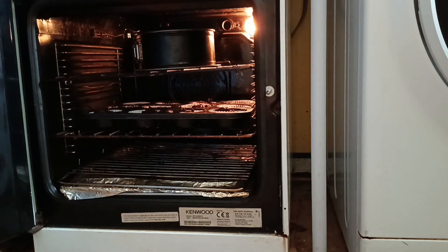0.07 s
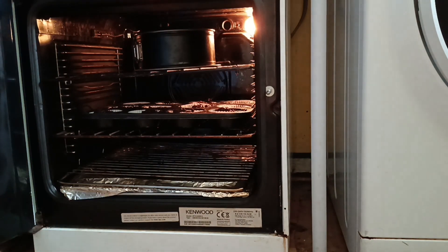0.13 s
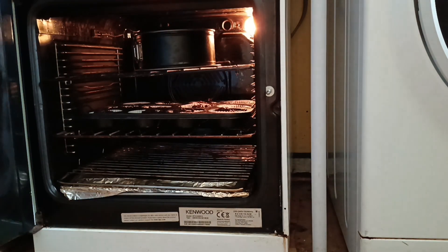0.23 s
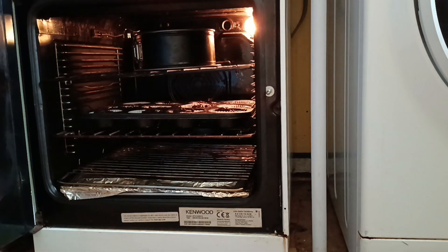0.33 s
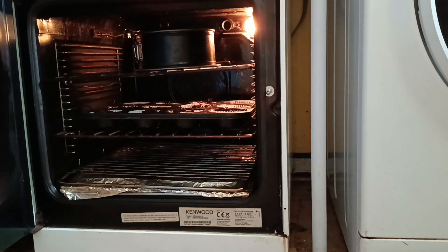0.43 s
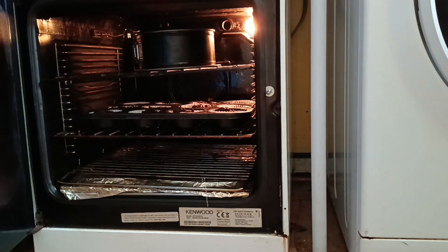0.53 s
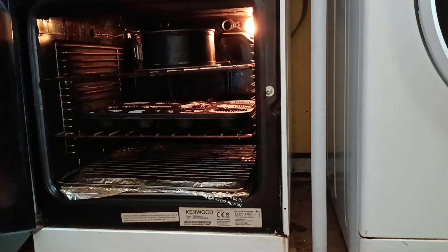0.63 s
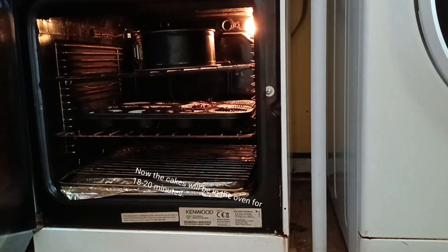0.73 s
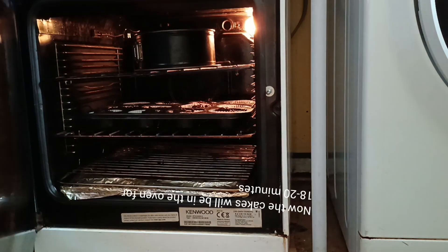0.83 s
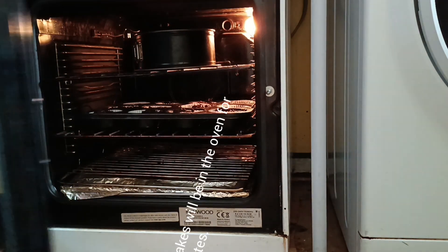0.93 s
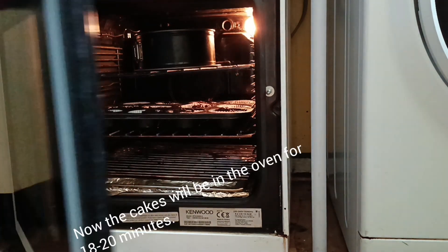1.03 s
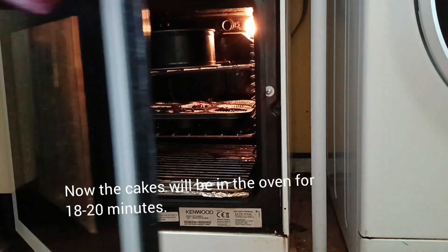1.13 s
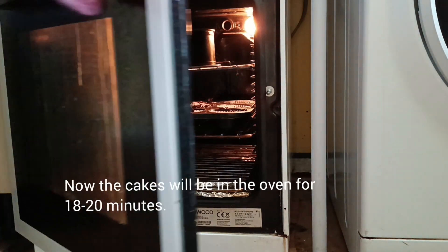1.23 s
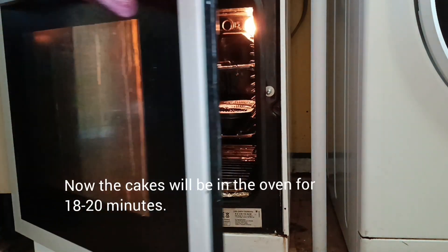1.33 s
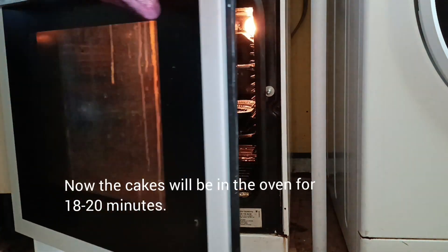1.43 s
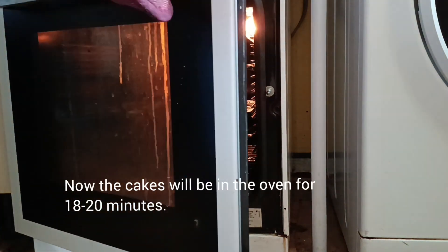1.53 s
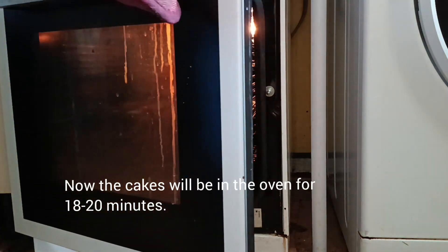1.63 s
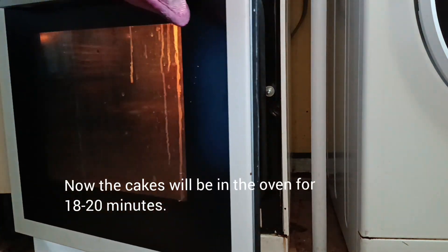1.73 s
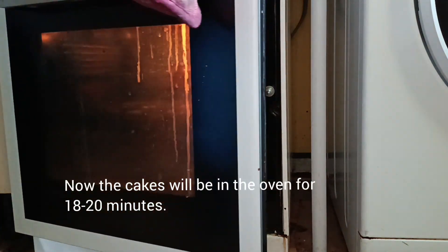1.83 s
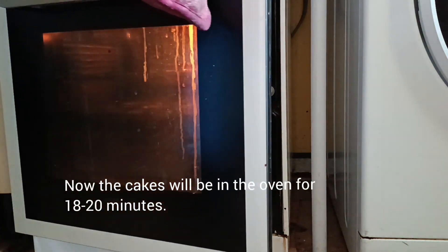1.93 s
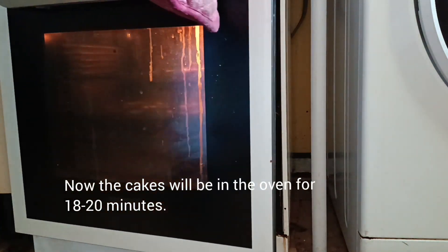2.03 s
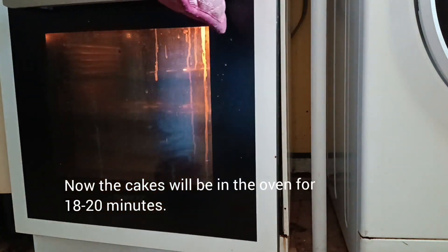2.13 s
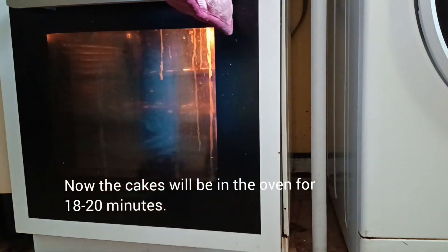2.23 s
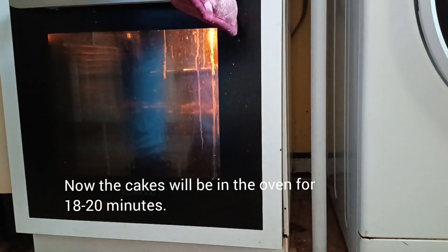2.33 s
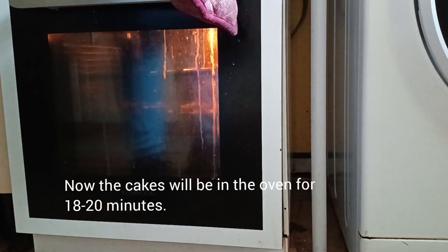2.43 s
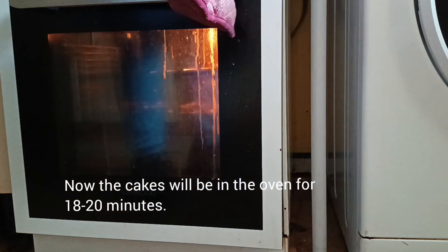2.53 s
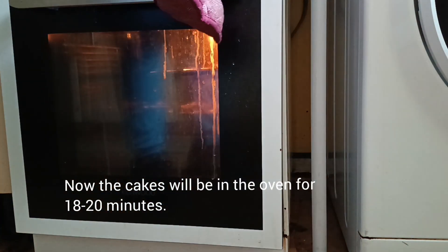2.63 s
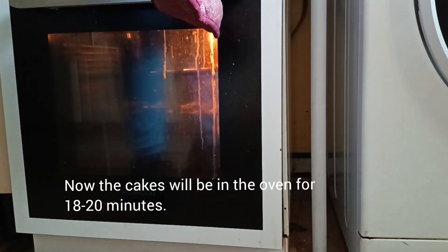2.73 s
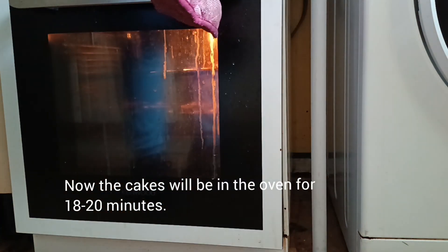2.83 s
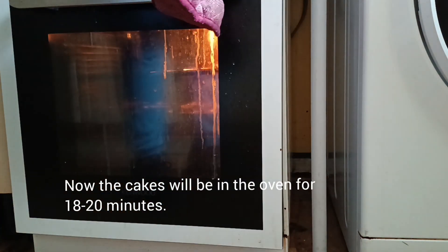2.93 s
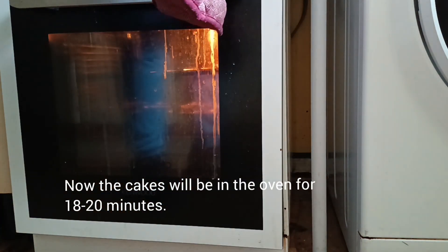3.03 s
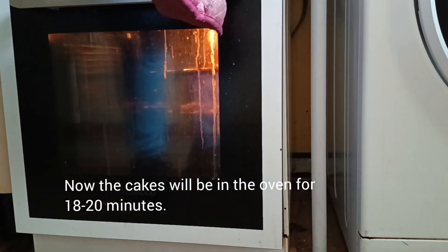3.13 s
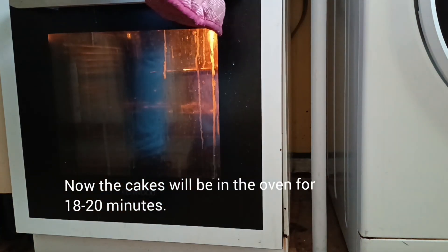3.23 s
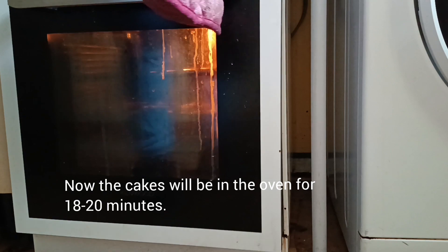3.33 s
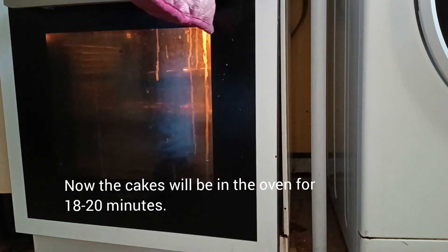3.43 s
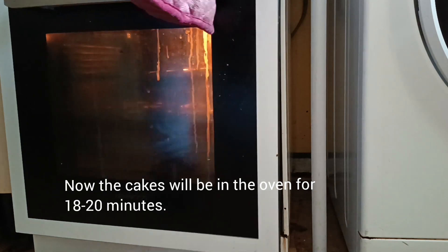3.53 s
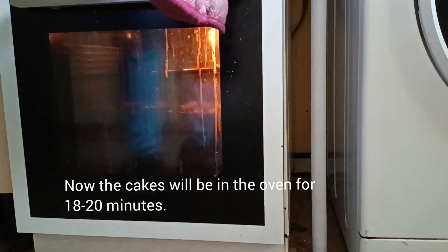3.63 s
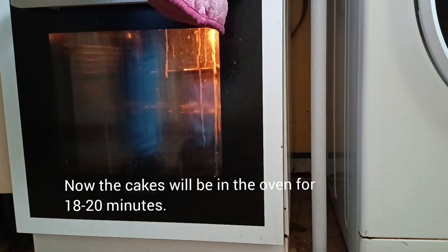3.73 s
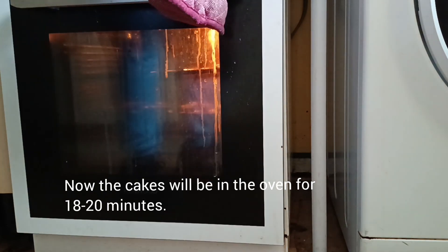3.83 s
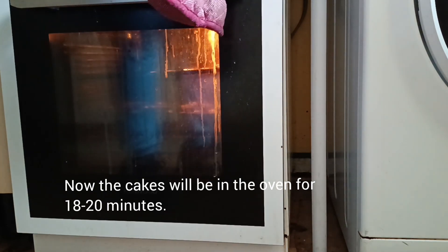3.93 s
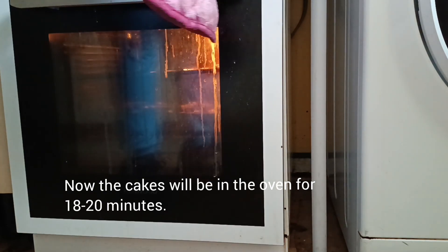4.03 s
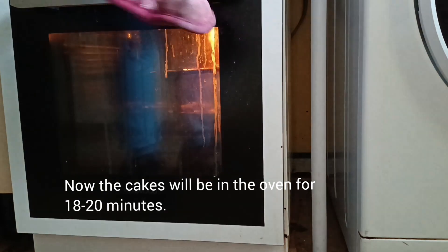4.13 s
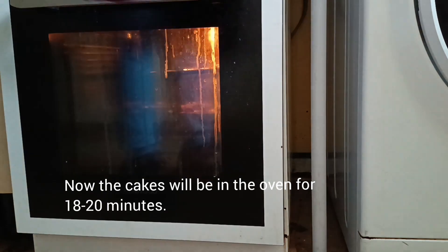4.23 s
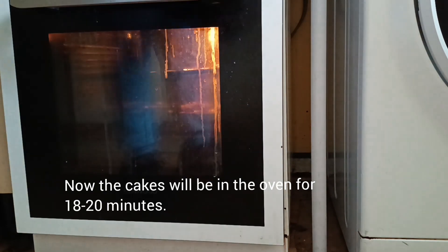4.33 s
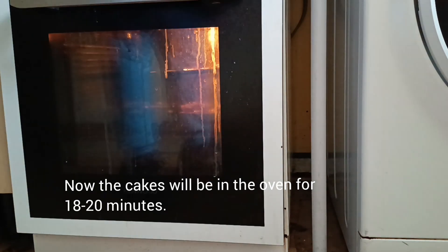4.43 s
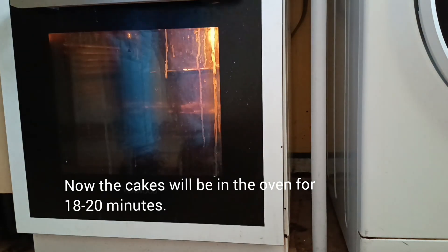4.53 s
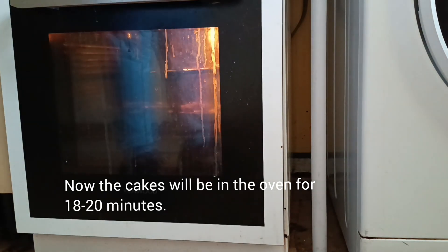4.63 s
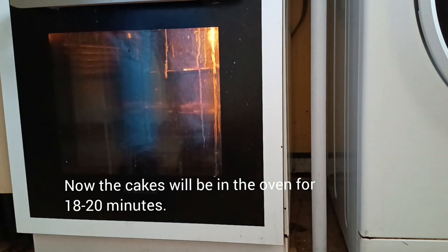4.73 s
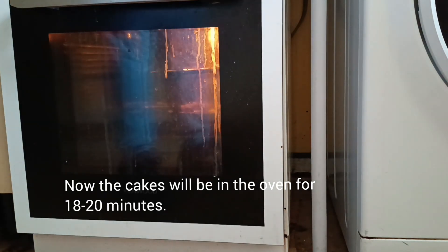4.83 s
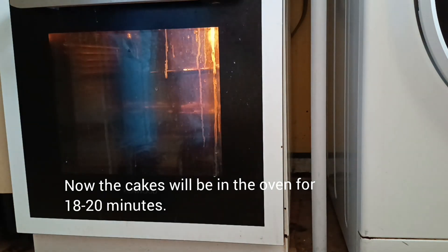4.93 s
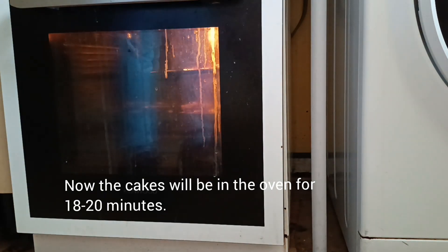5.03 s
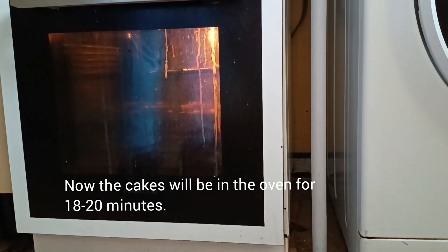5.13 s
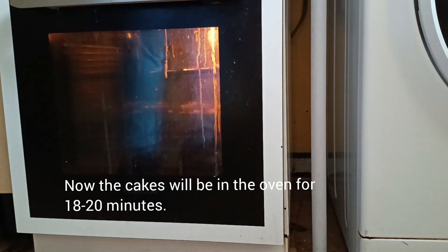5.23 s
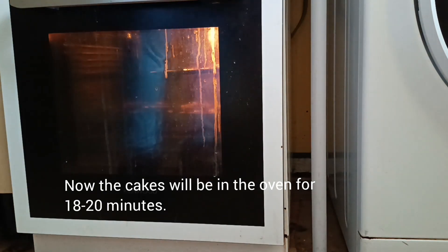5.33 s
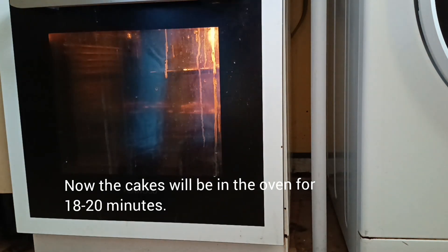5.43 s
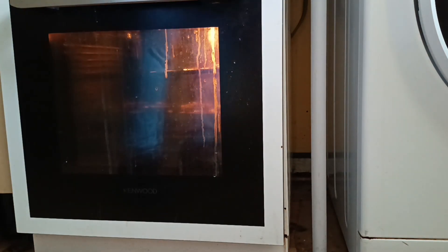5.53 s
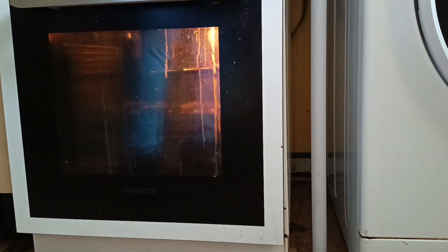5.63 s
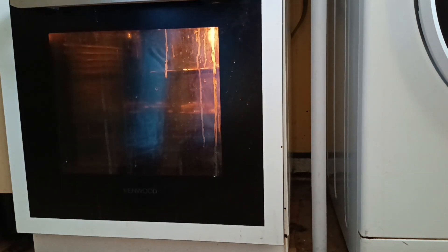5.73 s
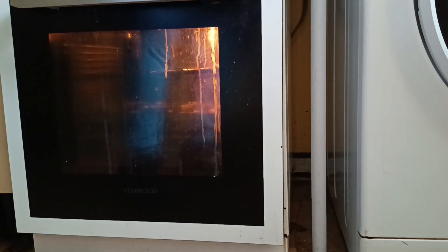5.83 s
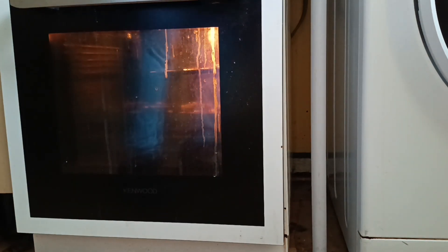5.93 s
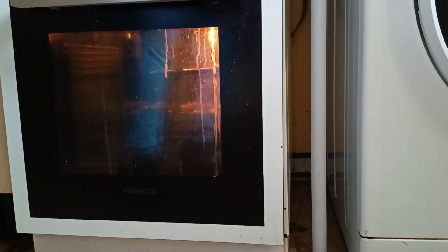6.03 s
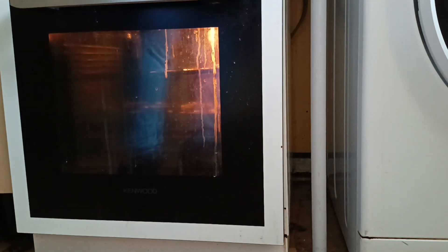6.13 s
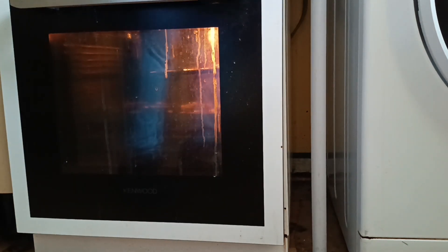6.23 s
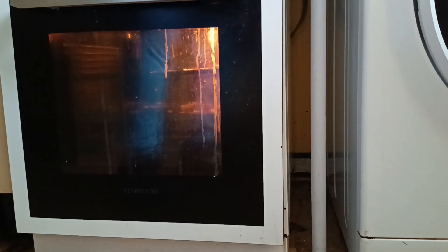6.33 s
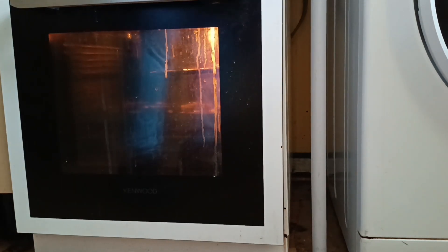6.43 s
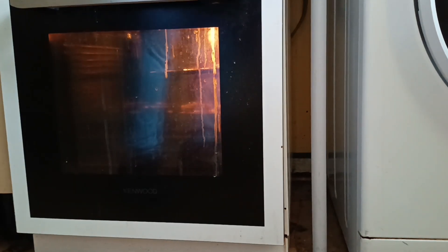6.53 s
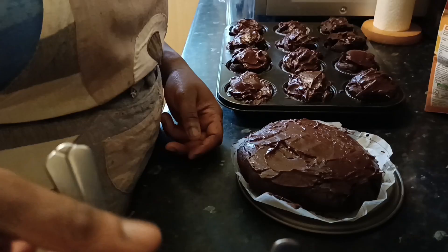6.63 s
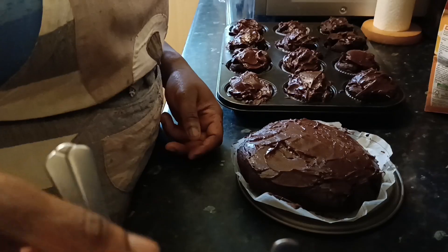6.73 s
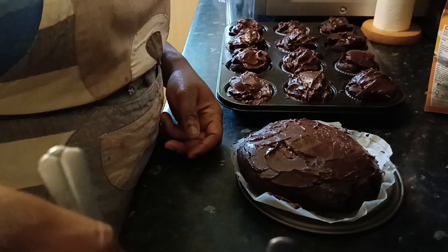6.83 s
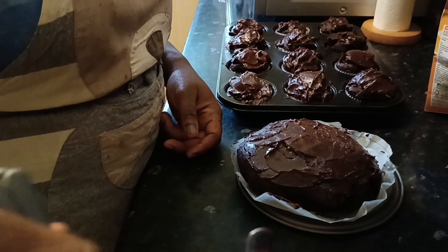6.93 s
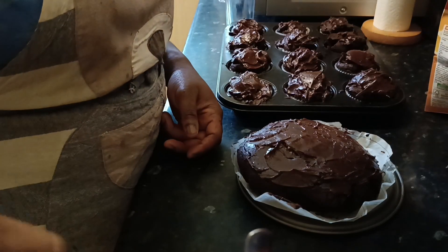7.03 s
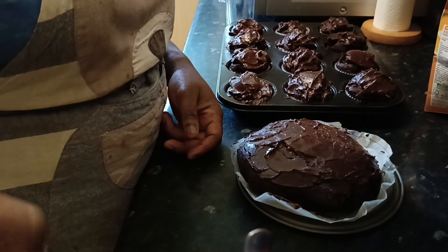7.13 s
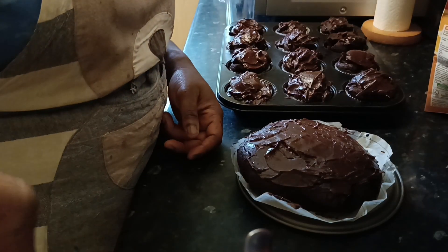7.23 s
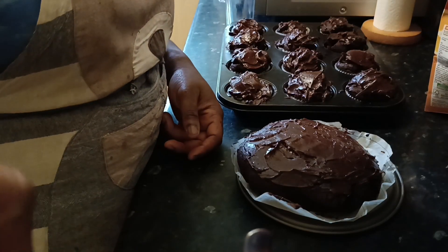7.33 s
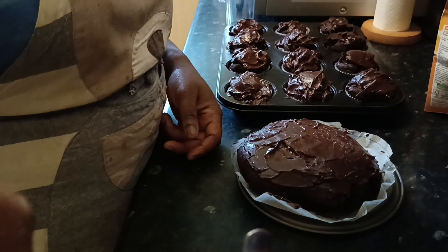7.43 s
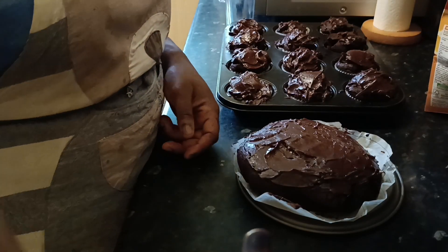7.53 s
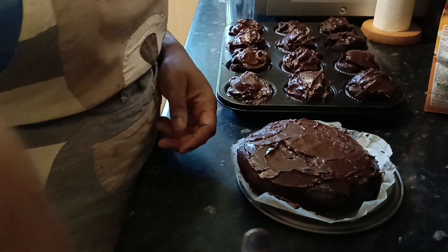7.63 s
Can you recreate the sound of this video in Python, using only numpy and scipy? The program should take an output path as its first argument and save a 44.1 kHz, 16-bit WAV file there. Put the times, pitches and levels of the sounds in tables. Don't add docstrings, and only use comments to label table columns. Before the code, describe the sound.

Oven fan noise, a door knocking once then banging closed with a rattle, dulled low hum, ratcheting clicks, brief silence, soft cloth rubbing and cutlery.

```python
import sys
import numpy as np
from scipy import signal
from scipy.io import wavfile
from scipy.ndimage import uniform_filter1d

SR = 44100
rng = np.random.default_rng(int(sys.argv[2]) if len(sys.argv) > 2 else 0)


def undo_db(level):
    steps = np.asarray(level, float) / 20
    return 10 ** steps


def pcm_store(signal):
    levels = np.round(np.clip(np.atleast_2d(signal), -1, 1) * 32767)
    wavfile.write(sys.argv[1], SR, levels.astype(np.int16).T)


N = 338757

SILENCE_S = (6.5756, 6.706)


def in_time(rows):
    s, *columns = np.transpose(rows)
    return [np.interp(np.arange(N) / SR, s, c) for c in columns]


def at_hz(points, hz, axis=1):
    points = np.array(points)
    return np.interp(np.log(hz), np.log(np.maximum(points[:, 0], 1)), points[:, axis])


def rms_one(x):
    return x / np.sqrt(np.mean(x ** 2) + 1e-20)


def drift(rate):
    r = np.exp(-80 * np.pi * rate / SR)
    white = rng.standard_normal(N // 40 + 2002)
    slow = signal.lfilter([1], [1, -2 * r, r * r], white)[2000:]
    return np.interp(np.arange(N) / 40, np.arange(len(slow)), rms_one(slow))


def ring(push, hz, t60):
    r, w = undo_db(-60 / (t60 * SR)), 2 * np.pi * hz / SR
    return signal.lfilter([0, np.sin(w)], [1, -2 * r * np.cos(w), r * r], push + 1e-18)


def dying(impulses, t60):
    return signal.lfilter([1], [1, -undo_db(-60 / (t60 * SR))], impulses + 1e-18)


def pair(mid, side, hz):
    # frequency in Hz, side over mid in dB.
    width = [(40, -22.5), (100, -21.5), (200, -7), (400, -11.5), (800, -1), (1500, -1), (4000, 1.53),
             (15000, -1.2)]
    # frequency in Hz, left over right in dB.
    tilt = [(60, -1.5), (150, 0.5), (380, 0.0), (950, 0), (2380, 0.5), (5980, -4.5), (15000, 10.5)]
    share = undo_db(at_hz(width, hz))
    ports = (mid + share * side * [[1], [-1]]) * np.sqrt(2 / (1 + share ** 2))
    return ports * undo_db(at_hz(tilt, hz) / 2 * np.array([[1], [-1]]))


def banded(white, gain_at):
    edges = np.geomspace(28, 16400, 23)
    out = 0
    for k, hz in enumerate(np.sqrt(edges[1:] * edges[:-1])):
        band = signal.butter(2, edges[k:k + 2], "band", fs=SR, output="sos")
        mid, side = signal.sosfilt(band, white[k % 2])
        out = out + gain_at(hz) * pair(mid, side, hz)
    return out


def swells(rows):
    t = np.arange(0, N + 40, 40) / SR
    total = 0
    for s, db, swell_ms, hold_ms, fade_ms in rows:
        rising = (s - t) * 1000 / swell_ms
        fading = np.maximum((t - s) * 1000 - hold_ms, 0) / fade_ms
        total = total + undo_db(db - 60 * np.where(t < s, rising, fading))
    return np.interp(np.arange(N) / SR, t, total)


def fan():
    # time in seconds, roar in dB, door shut 0-1.
    course = [(0, -44, 0.05), (1.1, -47, 0), (1.6, -44.5, 0.3), (2.1, -50, 0.12), (2.37, -51, 0.17),
              (2.7, -48.5, 0.51), (3.3, -51.5, 0.33), (3.55, -50.5, 0.09), (3.7, -49, 0.4),
              (4.2, -47.5, 0.81), (4.6, -49.5, 0.85), (5.5, -50.5, 0.93), (6.57, -53, 0.85)]
    # frequency in Hz, level in dB per Hz.
    open_roar = [(18, -69), (30, -42.5), (64, -38.5), (77, -12), (98, 2), (174, -3.5), (258, -11),
                 (402, -27.5), (483, -5), (662, -18.5), (1090, -13), (1310, -14.5), (1840, -13),
                 (5120, -46), (15800, -77.5)]
    # frequency in Hz, level in dB per Hz.
    shut_roar = [(18, -54), (30, -27.5), (43, -22), (69, -5), (103, -0.5), (127, -15.5), (156, -21.5),
                 (372, -14.5), (483, -40.5), (981, -35.5), (1450, -28), (8200, -61), (15800, -67.5)]
    # frequency in Hz, width in Hz, level in dB, change when shut in dB.
    cavity = [(207, 50, -11, -0.5), (302.3, 35, -18, 1), (475.4, 72, -8, -7), (586.5, 61, -10.5, -15),
              (741, 81, -10, -12.5), (1096, 120, -2, -26.5), (1249, 92, -9, -21), (1785, 100, -16, -17.5),
              (839, 12, -18, -11.5), (1990, 54, -29.5, -12), (2340, 110, -16, -11)]
    hum_hz, hum_turns = 99.97, -.165
    hum_db, hum_shut_db = -52, 12

    roar_db, shut = in_time(course)
    gusts = drift(9)

    def colour(hz):
        door_db = (1 - shut) * at_hz(open_roar, hz) + shut * at_hz(shut_roar, hz)
        return undo_db(door_db + 1.7 * gusts + 0.51 * drift(23))

    roar = undo_db(24.5) * banded(rng.standard_normal((2, 2, N)), colour)
    for hz, width_hz, level_db, shut_db in cavity:
        mode = rms_one(ring(rng.standard_normal((2, N)), hz, 4.1 / width_hz))
        roar += undo_db(level_db + shut_db * shut + 2.2 * drift(7.2)) * pair(*mode, hz)
    hum = np.sin(2 * np.pi * (hum_hz * np.arange(N) / SR + hum_turns))
    hum_level = undo_db(hum_db + hum_shut_db * shut + 3.5 + 0.39 * drift(3.2))
    return undo_db(roar_db) * roar + hum_level * hum


def cloth():
    # start in seconds, level in dB, hold in ms, fade in ms per 60 dB.
    grips = [(0.489, -50, 84, 348), (0.678, -72, 10, 300), (1.06, -58.5, 12, 193), (1.389, -56.5, 26, 218),
             (1.468, -62, 15, 149), (1.56, -51.5, 50, 203), (1.775, -61, 27, 251), (1.875, -70, 36, 900),
             (2.728, -66, 18, 294), (2.795, -87, 15, 251), (3.306, -70, 20, 897), (4.334, -66, 18, 400),
             (4.426, -69, 7.3, 409), (4.614, -50, 136, 212), (5.28, -54.5, 11, 150), (5.356, -57, 10, 300),
             (5.91, -65, 7.4, 240)]
    # peak in seconds, level in dB, swell and fade in ms per 60 dB.
    sways = [
        (0.43, -69.5, 3500, 1208),
        (1.24, -69, 800, 550),
        (1.7, -72, 500, 400),
        (3.134, -68.5, 1400, 900),
        (4.3, -66.5, 900, 1400),
        (5.26, -65, 2200, 300),
        (5.43, -71, 300, 1403),
    ]
    # time in seconds, rub in dB, slide 0-1, fold resonance in Hz.
    worktop = [
        [(6.706, -69, 0, 2420), (6.716, -53, 0.2, 2430), (6.77, -60.5, 0.3, 2040), (6.794, -44.5, 0.34, 1990),
         (6.836, -56, 0, 1900), (6.854, -48.5, .3, 1894), (6.936, -47.5, 0.82, 2730), (7.028, -54, 0.75, 2505),
         (7.16, -62, 0.49, 2460)],
        [(7.275, -51, 0.93, 2057), (7.301, -45, 0.79, 2450), (7.365, -45.5, 1.15, 2360),
         (7.403, -41, 0.76, 2314), (7.471, -42.5, 0.78, 2113), (7.547, -49.5, 0.68, 2086),
         (7.599, -43, 0.9, 2000), (7.661, -46, 0.68, 2150), (7.68, -39.5, 1.06, 2210)],
    ]
    # frequency in Hz, level in dB per Hz.
    far_colour = [(300, -24.5), (1000, -10), (2500, 5), (6000, -4.5), (10000, -10), (13000, -12),
                  (15800, -10.5)]
    # frequency in Hz, level in dB per Hz.
    near_colour = [(40, -18.5), (80, 12), (140, 15), (300, 10), (600, 10), (1100, 7), (2500, 10),
                   (4000, 5.5), (6000, 8), (10000, 4), (15000, 4)]
    catch_ms = 25
    still_db = -78.5
    press_body_db, slide_body_db = 15.5, -5
    press_bright_db, slide_bright_db = -13, -4

    unevenness = 4.94 * np.minimum(rng.exponential(1, N), 4) + 0.87 * drift(40)
    grains = rng.standard_normal((2, 2, N)) * undo_db(unevenness)
    rustles = [(s, db, catch_ms, hold, fade) for s, db, hold, fade in grips]
    rustles += [(s, db, swell, 0, fade) for s, db, swell, fade in sways]
    glove_db = 20 * np.log10(swells(rustles) + undo_db(still_db))
    near = np.arange(N) > SILENCE_S[1] * SR
    mid_db, slide, fold_hz = in_time(worktop[0] + worktop[1])
    body_db = mid_db + (1 - slide) * press_body_db + slide * slide_body_db
    bright_db = mid_db + (1 - slide) * press_bright_db + slide * slide_bright_db

    def gain(hz):
        low = np.interp(np.log(hz), np.log([500, 1200]), [1, 0])
        high = np.interp(np.log(hz), np.log([3500, 6000]), [0, 1])
        close_db = low * body_db + high * bright_db + (1 - low - high) * mid_db + at_hz(near_colour, hz)
        far_db = glove_db + 6.0 + at_hz(far_colour, hz)
        return undo_db(np.where(near, close_db, far_db) + 2.1 * drift(39))

    slow = rms_one(signal.sosfilt(signal.butter(2, 260, fs=SR, output="sos"), grains[0]))
    carrier = np.cos(2 * np.pi * np.cumsum(fold_hz) / SR)
    fold = slow * carrier * undo_db(mid_db - 1 + 2.0 * drift(7.2)) * near
    return banded(rms_one(grains), gain) + fold


def clicks():
    # start in seconds, peak in dB, ring in Hz, brightness in dB.
    small_parts = [(0.4893, -46, 2320, -23), (0.68, -41, 2040, -10), (1.5828, -33, 2340, -14),
                   (1.8226, -53, 2190, -16), (2.728, -42, 7540, -9), (2.745, -33, 2700, -17),
                   (3.3166, -36, 2340, -22), (4.271, -55, 2800, 4), (4.3313, -51, 2100, -6),
                   (4.428, -44.5, 3700, -2), (4.615, -31, 2150, -24), (4.6426, -29.5, 3320, -13),
                   (4.6844, -34, 2210, -13), (5.91, -42, 2230, -27), (6.3966, -29, 3580, -12),
                   (6.9225, -27, 3020, -2), (7.167, -52.5, 2150, 13), (7.2325, -39.5, 7000, -3),
                   (7.044, -52, 6000, 4), (7.0803, -44, 2600, -15), (7.266, -35, 2100, -9),
                   (7.3927, -32.5, 2300, 1.5), (7.425, -41, 3000, 3), (7.49, -42, 3010, 6),
                   (7.57, -52, 3000, -1), (7.592, -46, 3000, 5), (7.666, -45, 3000, 1),
                   (4.72, -42, 2500, -12), (4.75, -48, 2500, -12)]
    # start in seconds, peak in dB, ring in Hz, brightness in dB, rise in ms.
    teeth = [(5.272, -34, 2400, -10, 6), (5.281, -32, 2600, -9, 2.5), (5.313, -36, 3400, -5, 1.5),
             (5.318, -37, 2190, -6, 1), (5.357, -35, 3400, -1, 2), (5.3635, -29, 3000, -12, 1),
             (5.432, -32, 3000, -7, 2), (5.436, -28, 3330, -10, 1.2), (5.443, -27.5, 3430, -11, 1.1),
             (5.449, -28, 3400, -15, 1), (5.5268, -28.5, 3460, -8, 1.5), (5.532, -27, 3450, -12, 1.1),
             (5.5382, -22, 3320, -15, 0.48), (5.54, -25.5, 3300, -15, 0.45), (5.608, -48, 3000, 5, 3),
             (5.614, -24, 2620, -16, 3.7), (5.625, -23, 3030, -16, 0.23), (5.628, -20.5, 3330, -19.5, .6),
             (5.632, -27, 3300, -22, .6)]
    # frequency in Hz, level in dB.
    overtones = [(6000, 0.5), (8500, -15.5), (12500, -7.0)]
    click_t60_s, click_rise_ms, tooth_t60_s = 0.24, 1, 0.25

    out, t = np.zeros((2, N)), np.arange(int(.3 * SR)) / SR
    rows = [(*click, click_t60_s, click_rise_ms) for click in small_parts]
    rows += [(*tooth, tooth_t60_s, rise_ms) for *tooth, rise_ms in teeth]
    noises = rng.standard_normal((len(rows), 2, len(t)))
    high_pass = signal.butter(2, 1300, "high", fs=SR, output="sos")
    for (s, peak_db, hz, bright_db, t60, rise_ms), noise in zip(rows, noises):
        onset = 1 - np.exp(-1000 * t / max(rise_ms, .1))
        decay = undo_db(-60 * t / 0.038) + undo_db(-12.5 - 60 * t / t60)
        scratch = noise * onset * decay
        body = undo_db(-8.5) * ring(scratch, hz, 8.3 / hz)
        shine = sum(undo_db(db) * ring(scratch, over_hz, 0.00063) for over_hz, db in overtones)
        broad = signal.sosfilt(high_pass, scratch)
        click = body + undo_db(bright_db) * shine + undo_db(-18) * broad
        i = int(s * SR)
        out[:, i:i + len(t)] += undo_db(peak_db - 6.5) * click[:, :N - i]
    return out


def thuds():
    # start in seconds, level in dB, pitch in Hz, t60 in seconds, scuff 0-1.
    oven_knocks = [(.52, -34.5, 210, 0.12, 0.6), (2.378, -8, 385, 0.07, 0.1), (2.401, -19, 380, 0.1, 0.14),
                   (2.452, -18, 114, 0.23, 0.2), (2.477, -13.5, 118, 0.059, 0.43),
                   (2.43, -25, 490, 0.19, .3), (2.403, -13, 736, 0.075, 0.32), (2.56, -31, 120, 0.11, 0.17),
                   (3.752, -19.5, 130, .15, .1), (3.8255, -13, 116, .14, 0.08), (3.7, -14, 360, 0.18, 0.26),
                   (3.704, -12.5, 2070, .03, .3), (3.708, -14.5, 2800, 0.021, .3),
                   (3.727, -17, 2100, .03, .3), (3.776, -20, 2000, 0.028, 0.4),
                   (2.398, -15, 125, 0.078, 0.3), (2.38, -13.5, 1600, 0.048, 0.06),
                   (2.999, -36, 360, 0.026, 0.83), (3.33, -36.5, 70, 0.18, 0.2),
                   (3.6825, -1, 312, 0.04, 0.04), (3.683, -20, 270, 0.27, 0.4),
                   (3.701, -11, 1547, 0.068, 0.5), (4.032, -13, 15000, 0.0015, 0.53),
                   (4.032, -11, 1560, 0.023, 0.33), (4.634, -26, 900, 0.0085, 0.9),
                   (4.665, -29, 640, 0.0045, 0.9), (4.7, -38, 800, 0.0098, 0.8),
                   (4.68, -38, 2160, 0.07, 0.6), (5.4429, -36, 3200, .03, 0.1),
                   (5.5382, -29, 3150, .03, 0.2), (5.625, -26, 3000, .012, 0),
                   (5.6285, -27, 3250, .035, 0.1), (5.62, -40.5, 231, 0.16, 0.34),
                   (6.3956, -28.5, 2850, 0.018, 0.14), (6.3969, -24, 2180, 0.016, 0.15)]
    # start in seconds, level in dB, pitch in Hz, t60 in seconds, scuff 0-1.
    top_knocks = [(6.716, -37, 400, 0.092, 0.67), (6.787, -22.5, 146, 0.13, 0.11),
                  (6.786, -31, 800, 0.025, 0.42), (6.854, -28.5, 106, 0.14, 0.15),
                  (6.921, -32, 3800, 0.049, 0.25), (6.922, -33, 2900, 0.1, 0.46),
                  (6.848, -34, 1700, 0.023, 0.7), (7.4, -34, 2000, 0.015, .8),
                  (6.947, -29.5, 1100, 0.022, 0.4), (7.029, -42, 996, 0.069, 0.14),
                  (7.02, -39, 2600, 0.017, 0.8), (7.07, -32.5, 2700, 0.016, 0.64),
                  (7.4, -45, 170, 0.17, 0.9), (7.61, -38, 140, 0.23, 0.45)]

    out, t = np.zeros((2, N)), np.arange(SR // 3) / SR
    knocks = oven_knocks + top_knocks
    noises = rng.standard_normal((len(knocks), 2, len(t)))
    for (s, level_db, hz, t60, scuff), noise in zip(knocks, noises):
        i, scuff = int(s * SR), np.clip(scuff, 0, 1)
        blow = (1 - scuff) * (t == 0) * [[1], [0]]
        push = blow + scuff * 0.1 * noise * undo_db(-60 * t / 0.16)
        out[:, i:i + len(t)] += pair(*ring(undo_db(level_db - 3.5) * push, hz, t60), hz)[:, :N - i]
    return out


def door():
    # time in seconds, then peak, boom, clang and hiss in dB.
    blows = [
        (2.372, -15.5, -28, -10, -22.5),
        (2.378, -13.5, -30, -0.5, -13.5),
        (2.405, -28, -12, -12, -19),
        (3.678, -11.5, -14.5, -7, -12),
        (3.681, -10.5, -16.5, -3.5, -17.5),
        (3.7, -10.5, -11.5, 1, -18),
        (4.031, -37, -22, 15, -21),
    ]
    # frequency in Hz, level in dB, t60 in seconds.
    modes = [(86.2, -8.5, 0.28), (98.4, -7.5, 0.4), (125, -10.5, 0.18), (185.6, -17.5, 0.49),
             (202, -20.5, 0.65), (270, -18, 0.14), (361, -11.5, 0.086), (412, -17, 0.096),
             (492.5, -18.5, 0.13), (530, -12, 0.12), (745, -14, 0.17), (825, -21, 0.036), (1046, -21, 0.17),
             (1230, -21, 0.033), (1440, -21, 0.046), (1500, -21, 0.044), (1700, -15, 0.091),
             (1863, -16, 0.051), (2040, -16.5, 0.041), (2073, -10, 0.023), (2300, -13, 0.031),
             (2420, -24.5, 0.076), (2674, -12.5, 0.067), (3020, -19.5, .06), (3830, -24.5, 0.034)]
    # start in seconds, level in dB, tilt in dB per octave, hold in seconds, t60 in seconds.
    shake_rows = [
        (2.382, -18.5, -0.5, 0.0029, 0.06),
        (2.397, -27, -0.5, 0.0033, 0.45),
        (2.456, -56, 2, 0.14, 1),
        (3.684, -25, 2, 0.01, 0.28),
        (3.707, -26, -1, 0.044, 0.62),
        (3.757, -49.5, 3, 0.14, 0.22),
        (3.799, -55, 5, 0.095, 0.18),
        (3.702, -33.5, 2.5, 0.01, .1),
        (4.032, -30, 2.5, 0.0023, 0.074),
        (4.041, -40, 0.5, 0.021, 0.3),
    ]
    # frequency in Hz, level in dB.
    shake_colour = [(150, 3.5), (500, -0.5), (2200, 1), (8000, -12.5)]
    # frequency in Hz, level in dB per Hz.
    rattle = [(40, -38), (70, -26.5), (120, 5), (250, 12.5), (300, 12.5), (1100, 3), (1300, 6.5),
              (3500, 4.5), (5000, 2), (9000, 4.5), (15000, -12.5)]

    span = slice(int(2.3 * SR), int(4.9 * SR))
    size = span.stop - span.start
    s, peak_db, boom_db, clang_db, hiss_db = np.transpose(blows)
    at = (s * SR).astype(int) - span.start
    start_s, shake_db, octave_db, hold_s, t60_s = np.transpose(shake_rows)[:, :, None]
    since = np.arange(span.start, span.stop) / SR - start_s
    fall_db = 60 * np.maximum(since - hold_s, 0) / t60_s
    shakes = (since > 0) * undo_db(shake_db - fall_db + 0.65 * drift(70)[span])
    regions = np.log([150, 500, 2200, 8000])

    def strikes(hz, scatter_db):
        train = np.zeros(size)
        colours = zip(boom_db, clang_db, hiss_db)
        tilt_db = [np.interp(np.log(hz), regions, [b, 0, c, h]) for b, c, h in colours]
        train[at] = undo_db(peak_db + tilt_db + scatter_db * rng.standard_normal(len(at)))
        return train

    def shaking(hz):
        octaves = np.log2(np.clip(hz, 150, 13000) / 500)
        return undo_db(at_hz(shake_colour, hz) + octave_db[:, 0] * octaves) @ shakes

    def crack(hz):
        scrunch = undo_db(2) * dying(strikes(hz, 1.6), 0.032) * (hz > 200)
        return scrunch + undo_db(at_hz(rattle, hz)) * shaking(hz)

    ringing = 0
    for hz, level_db, t60 in modes:
        push = undo_db(1.5) * dying(strikes(hz, 1.6), 0.011) / (0.0074 * SR / 7) ** .5
        push = push + undo_db(13.0) * shaking(hz) / (t60 * SR) ** .5
        mode = ring(push * rng.standard_normal((2, size)), hz, t60)
        ringing = ringing + undo_db(level_db) * pair(*mode, hz)
    whole = np.zeros((2, N))
    whole[:, span] = ringing + banded(rng.standard_normal((2, 2, size)), crack)
    return whole


def hinge():
    # frequency in Hz, level in dB.
    spring = [(2000, -65), (2750, -58.5), (3670, -63.5), (4470, -70), (5550, -77), (5950, -75), (7880, -81)]
    # centre in seconds, half length in seconds, level in dB, tilt in dB per octave,
    # pitch glide as a share.
    slips = [
        (2.68, .025, -4, 3, 0),
        (2.75, .025, 3, 4, 0),
        (2.81, .04, -1, 1, -.01),
        (2.95, .04, -5, 2, .01),
        (2.99, .02, -2, -10, .1),
        (3.07, .03, -5, 2, 0),
        (3.18, .05, 0, -5, -.06),
        (3.395, .012, -14, 7, 0),
    ]

    out, broken = np.zeros((2, N)), undo_db(3.5 * drift(30))
    scatter = rng.standard_normal((len(slips), 2, len(spring)))
    for (s, half_s, slip_db, octave_db, glide), uneven in zip(slips, scatter):
        bell = np.hanning(int(3 * half_s * SR))
        i = int(s * SR) - len(bell) // 2
        noise = rng.standard_normal((2, SR // 2))[:, :len(bell)]
        bend = np.cumsum(1 + glide * np.linspace(-.5, .5, len(bell))) / SR
        for (hz, level_db), detune, strength in zip(spring, *uneven):
            flutter = rms_one(uniform_filter1d(noise * np.cos(2 * np.pi * hz * bend), size=520))
            whistle = 1.4 * flutter * np.sin(2 * np.pi * hz * (1 + .012 * detune) * bend)
            whistle_db = slip_db + level_db + 1.5 * strength + octave_db * np.log2(hz / 2750)
            out[:, i:i + len(bell)] += undo_db(whistle_db) * bell * whistle
    return out * broken


def scene():
    oven_air = fan() * (np.arange(N) < SILENCE_S[0] * SR)
    return oven_air + cloth() + clicks() + thuds() + door() + hinge()


def roll_off(x):
    return signal.sosfilt(signal.butter(12, 16650, fs=SR, output="sos"), x)


def record(dry):
    x = signal.sosfilt(signal.butter(3, 50, "high", fs=SR, output="sos"), dry)
    t = np.arange(N) / SR
    x = 0.83 * np.tanh(x / 0.95) * ((t < SILENCE_S[0]) | (t > SILENCE_S[1]))
    x = signal.sosfilt(signal.ellip(10, .5, 60, 15850, fs=SR, output="sos"), x)
    return roll_off(x)


dry = scene()
out = record(dry)
pcm_store(out)
```